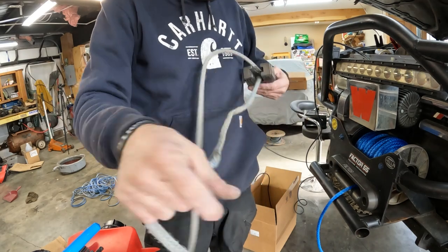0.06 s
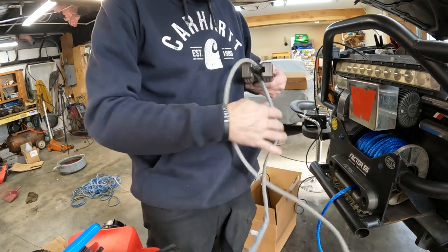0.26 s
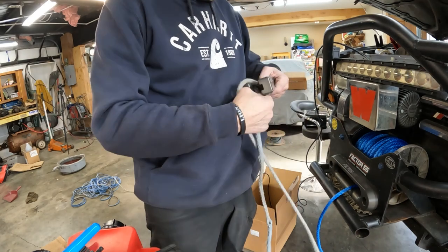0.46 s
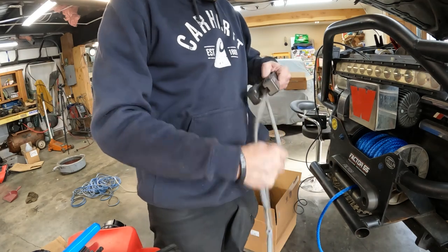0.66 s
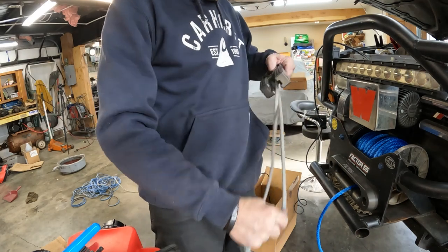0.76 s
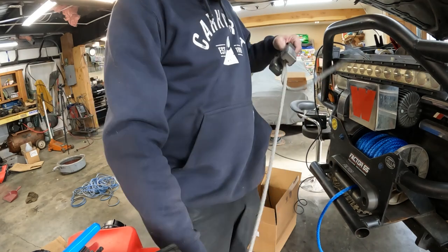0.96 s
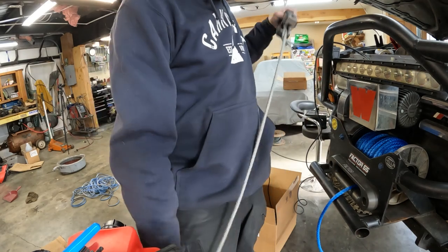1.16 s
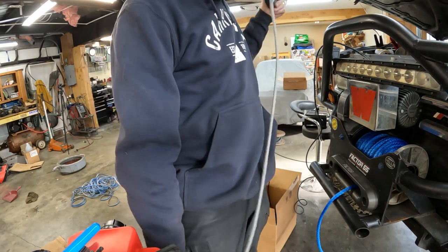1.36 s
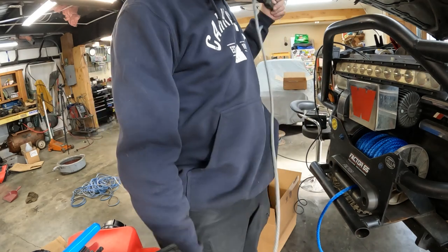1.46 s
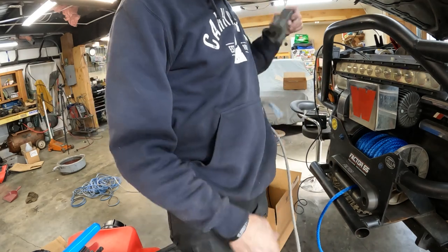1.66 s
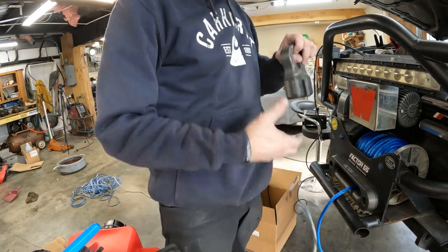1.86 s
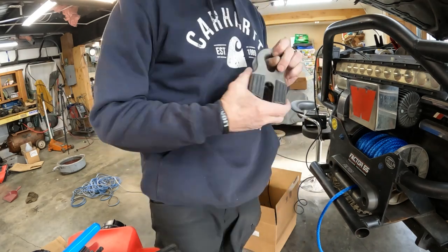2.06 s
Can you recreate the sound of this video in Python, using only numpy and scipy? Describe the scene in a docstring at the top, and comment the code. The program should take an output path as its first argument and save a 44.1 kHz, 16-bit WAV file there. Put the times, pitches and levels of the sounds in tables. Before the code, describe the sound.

A braided rope hisses softly through a hand in a workshop. Low hollow thumps come early, then a double tock, and near the end a metal fitting knocks sharply and clicks. Ventilation rumbles steadily behind the close sounds.

```python
"""Workshop: a hand slides along a braided rope. Fibres hiss on the skin, strands tick under the grip, and the
rope snaps through the fingers with a double tock. The swinging rope thumps, and each tug pulls it taut so that
its low modes boom on. The metal end fitting knocks and clicks as it changes hands. Ventilation rumbles and hums
throughout; arm swings stir a low draught."""
import sys
import numpy as np
from scipy import signal
from scipy.fft import rfft, irfft, next_fast_len
from scipy.io import wavfile
from scipy.ndimage import map_coordinates

SR = 44100
rng = np.random.default_rng(int(sys.argv[2]) if len(sys.argv) > 2 else 0)


def to_wav(s):
    """Save 16-bit WAV."""
    ch = np.atleast_2d(s).T  # columns
    pcm = np.round(np.clip(ch, -1, 1) * 32767)  # PCM
    wavfile.write(sys.argv[1], SR, pcm.astype(np.int16))


N = 92610
T = np.arange(N) / SR

# Sliding hiss envelope (time [s], level [dB])
SLIDE_LEVELS = [(0, -55), (.02, -57), (.085, -65), (.24, -72.5), (.29, -63.5), (.42, -69.5), (.55, -68),
                (.65, -59), (.73, -54.5), (.8, -54.5), (.92, -57.5), (1.04, -62.5), (1.14, -60),
                (1.25, -62.5), (1.3, -69), (1.39, -71), (1.44, -62.5), (1.53, -74), (1.69, -66.5),
                (1.78, -70), (1.82, -58), (1.87, -67), (1.96, -70.5), (2.04, -63.5), (2.1, -72)]
# Skin-on-braid friction (frequency [Hz], gain [dB])
BRAID_SPECTRUM = [(200, -44), (700, 1), (1500, -7), (2600, 2), (3600, 0.5), (4700, -1.5), (5500, -8),
                  (6800, -9), (8300, -6), (11000, -12), (15500, -18)]
# Strand ticks and tock grit (frequency [Hz], gain [dB])
STRAND_SPECTRUM = [(300, 2), (900, 1), (2500, 0.5), (4200, -8), (6000, -23), (15000, -25)]
# Rope snaps (time [s], level [dB])
TOCK_HITS = [(.8285, -40), (.8365, -44)]
# Tock resonances (frequency [Hz], gain [dB])
TOCK_MODES = [(1000, -3), (1220, 2), (1650, -1), (2060, -4), (2550, -10)]
# Rope blows (time [s], thud [dB], thud centre [Hz], boom [dB], slap [dB], slap cutoff [Hz], push [dB])
THUMP_HITS = [(0.058, -76, 120, -44, -80, 800, -52), (0.2614, -29.5, 99, -31.5, -36.5, 880, -36.5),
              (0.276, -36, 190, -59, -46.5, 890, -24), (.288, -27, 137, -28, -72, 800, -42),
              (.3515, -29, 170, -26.5, -32, 1520, -32), (.362, -22.5, 141, -49, -34.5, 1130, -40),
              (0.377, -29, 136, -47, -50, 1000, -58), (.396, -34, 176, -50, -46, 1190, -30),
              (1.388, -31, 127, -38, -59.5, 500, -39), (1.411, -33, 130, -52, -64, 500, -28)]
# Rope slap (frequency [Hz], gain [dB])
SLAP_SPECTRUM = [(100, -42), (330, 9), (480, -2.5), (720, 3), (900, 2), (1150, -0.5), (1450, -16.5),
                 (1900, -17), (3300, -18)]
# Taut rope modes (frequency [Hz], gain [dB], T60 [s])
BOOM_MODES = [(95.55, -1, 1.1), (134, -5, 0.47), (159.2, 1.5, 0.24), (217.8, -15.5, .28),
              (244.8, -17, 0.26), (357.6, -12.5, .22)]
# Fitting impacts (time [s], crack [dB], low cutoff [Hz], high cutoff [Hz], knock [dB])
FITTING_HITS = [(0.111, -52, 990, 3980, -75), (.186, -53.5, 1500, 9200, -80),
                (0.3513, -40.5, 800, 3040, -59), (0.393, -47, 6900, 11800, -65),
                (1.144, -45, 1200, 11900, -45), (1.2647, -46.5, 1500, 3560, -75),
                (1.7994, -34, 600, 5900, -32), (1.8304, -35, 1200, 9000, -47),
                (1.8324, -25, 443, 13700, -41.5), (1.8372, -34, 600, 11000, -64),
                (1.847, -53, 900, 9000, -43), (1.983, -46.5, 4550, 10700, -70),
                (2.0038, -51, 4000, 6700, -44), (2.0235, -48, 1480, 7000, -53),
                (2.03, -38.5, 1200, 6070, -49), (2.04, -50, 1500, 6460, -65),
                (2.0476, -42, 1490, 4970, -64)]
# Fitting crack (frequency [Hz], gain [dB])
CRACK_SPECTRUM = [(300, -9), (750, 0), (1100, 1), (1500, -1), (2200, 1), (2800, 2), (3600, 2), (4400, 0),
                  (5600, -6), (7000, -6), (9000, -6), (12000, -10), (15500, -17)]
# Dull knock of the fitting (frequency [Hz], gain [dB])
KNOCK_SPECTRUM = [(60, -30), (240, 24.5), (450, 2), (800, 7), (1150, -7), (2000, -1), (6000, -60)]
# Ventilation rumble (frequency [Hz], gain [dB])
VENT_SPECTRUM = [(15, 10), (28, 2), (45, 7), (70, 8), (130, -1), (250, -0.5), (450, -4), (750, -1.5),
                 (1050, -6.5), (1400, -12.5), (2000, -22), (3500, -41), (6000, -32.5), (10000, -41.5),
                 (15500, -38)]
# Motor partials (frequency [Hz], level [dB])
HUM_PARTIALS = [(120, -65.5), (240, -68.5), (360, -68), (480.4, -60.5), (720, -70.5)]
# Air moving at the microphone (frequency [Hz], gain [dB])
DRAUGHT_SPECTRUM = [(2, -71), (10, 38), (20, 34.5), (35, -18.5), (70, -58), (200, -60)]
# Arm swings (time [s], draught boost [dB])
ARM_SWINGS = [(.25, 15.5), (0.748, 10)]
# Room decay (frequency [Hz], T60 [s])
ROOM_DECAY = [(100, 0.53), (1000, 0.39), (4000, .33), (12000, 0.13)]


def braid_hiss(grain_db=1.0, sway_db=0.87):
    """Fibres rub the skin in fine grains."""
    fibres = rng.standard_normal(N) * amp(grain_db * wobble(900) + sway_db * wobble(41))
    level_db = np.interp(T, *np.transpose(SLIDE_LEVELS))
    return coloured(fibres, BRAID_SPECTRUM) * amp(level_db)


def strand_ticks(rate_hz=247.8, jitter=0.22, scatter_db=2.0, grip_s=0.738, grip_sigma_s=0.032):
    """Single strands tick past the fingers during a brief firm grip."""
    gaps, sizes = rng.standard_normal(size=(700, 2)).T
    times_s = np.cumsum(np.exp(jitter * gaps)) / rate_hz
    slips = np.bincount((times_s * SR).astype(int), amp(-scatter_db * sizes), minlength=N)[:N]
    ticks = signal.fftconvolve(slips, fade(t60_s=0.0029))[:N] * rng.standard_normal(N)
    grip = bell(T - grip_s, grip_sigma_s)
    return amp(-52.5) * grip * coloured(ticks, STRAND_SPECTRUM)


def rope_tocks(grit_db=-6):
    """The rope snaps through the fingers: a hollow double tock after the fastest part of the stroke."""
    out = np.zeros(N)
    for time_s, level_db in TOCK_HITS:
        modes = sum(amp(db) * np.sin(2 * np.pi * (hz * T + rng.random())) for hz, db in TOCK_MODES)
        grit = amp(grit_db) * noise(STRAND_SPECTRUM)
        add(out, time_s, amp(level_db) * burst(unit(modes) + grit, t60_s=0.045))
    return out


def rope_thumps(thud_sigma_oct=0.62, push_s=0.014):
    """Each soft blow gives a thud, a slap and a push of air."""
    out = np.zeros(N)
    push = np.sin(2 * T / push_s) * np.exp(-0.5 * T / push_s)
    for time_s, thud_db, thud_hz, _, slap_db, cutoff_hz, push_db in THUMP_HITS:
        band = lambda hz: bell(np.log2((hz + 1) / thud_hz), thud_sigma_oct)
        lowpass = lambda hz: 1 / np.hypot(1, (hz / cutoff_hz) ** 6)
        thud = burst(filtered(rng.standard_normal(N), band), t60_s=0.089)
        slap = burst(filtered(noise(SLAP_SPECTRUM), lowpass), t60_s=0.075)
        add(out, time_s, amp(thud_db) * thud + amp(slap_db) * slap + amp(push_db) * push)
    return out


def taut_ring(attack_s=0.034, drift_rad=0.069):
    """Each thump pulls the rope taut and sets its low modes ringing on."""
    out = np.zeros(N)
    attack = 1 - np.exp(-T / attack_s)
    for hz, mode_db, t60_s in BOOM_MODES:
        energy = np.zeros(N)
        for time_s, _, _, boom_db, *_ in THUMP_HITS:
            add(energy, time_s, (amp(boom_db + mode_db) * fade(t60_s) * attack) ** 2)
        phase_rad = 2 * np.pi * (hz * T + rng.random()) + drift_rad * wobble(25)
        out += np.sqrt(energy) * np.sin(phase_rad)
    return out


def fitting_knocks(chatter_db=-14):
    """The fitting cracks and knocks dully; loose parts chatter. The hand damps any ring."""
    out = np.zeros(N)
    for time_s, crack_db, low_hz, high_hz, knock_db in FITTING_HITS:
        band = lambda hz: hz ** 2 / (hz ** 2 + low_hz ** 2) / np.hypot(1, (hz / high_hz) ** 5)
        crack = burst(filtered(noise(CRACK_SPECTRUM), band), t60_s=0.0069)
        chatter = amp(chatter_db) * burst(filtered(noise(CRACK_SPECTRUM), band), t60_s=0.03)
        knock = burst(noise(KNOCK_SPECTRUM), t60_s=0.024)
        add(out, time_s, amp(crack_db) * (crack + chatter) + amp(knock_db) * knock)
    return out


def early_echoes(x, delay_s=0.002):
    """Quick scatter off the bench and nearby surfaces."""
    echoes = rng.standard_normal(N) ** 3 * fade(t60_s=0.18) * (T > delay_s)
    return signal.fftconvolve(x, echoes / np.linalg.norm(echoes))[:N]


def room_tail(x):
    """Diffuse workshop reverberation; treble dies first."""
    hz, time_s, bins = signal.stft(rng.standard_normal(SR // 2), SR, nperseg=256)
    decay = np.exp(-np.log(1000) * time_s / log_interp(ROOM_DECAY, hz)[:, None])
    _, tail = signal.istft(bins * decay, SR, nperseg=256)
    return signal.fftconvolve(x, tail / np.linalg.norm(tail))[:N]


def ventilation(rumble_db=-51, waver_db=0.6, drift_rad=0.12):
    """Steady air rumble and slightly wavering motor hum."""
    hum = np.zeros(N)
    for hz, db in HUM_PARTIALS:
        peak = np.sqrt(2) * amp(db + waver_db * wobble(4.7))
        hum += peak * np.sin(2 * np.pi * hz * T + drift_rad * wobble(2))
    return amp(rumble_db) * noise(VENT_SPECTRUM) + hum


def draught(rest_db=-47, swing_sigma_s=0.037):
    """Air drifts over the microphone, more when the arm swings."""
    boost_db = sum(db * bell(T - time_s, swing_sigma_s) for time_s, db in ARM_SWINGS)
    return amp(rest_db + boost_db) * noise(DRAUGHT_SPECTRUM)


def amp(db):
    """Decibels to gain."""
    return 10 ** (np.asarray(db) / 20)


def unit(x):
    """Scale to rms 1."""
    return x / np.sqrt(np.mean(x ** 2) + 1e-20)


def bell(offset, sigma):
    """Gaussian, peak 1."""
    return np.exp(-0.5 * (offset / sigma) ** 2)


def log_interp(points, hz):
    """Interpolate (frequency [Hz], value) points on a log axis."""
    knots_hz, values = np.transpose(points)
    return np.interp(np.log(hz + 1), np.log(knots_hz + 1), values)


def fade(t60_s):
    """Exponential decay."""
    return np.exp(-np.log(1000) * T / t60_s)


def wobble(rate_hz):
    """Smooth random curve with knots at rate_hz."""
    return map_coordinates(rng.standard_normal(int(N * rate_hz / SR) + 4), [T * rate_hz])


def filtered(x, response):
    """Zero-phase filter with gain response(hz)."""
    size = next_fast_len(N + SR // 2)
    return irfft(rfft(x, size) * response(np.fft.rfftfreq(size, 1 / SR)), size)[:N]


def coloured(x, spectrum):
    """x shaped by a spectrum, rms 1."""
    return unit(filtered(x, lambda hz: amp(log_interp(spectrum, hz))))


def noise(spectrum):
    """Shaped noise, rms 1."""
    return coloured(rng.standard_normal(N), spectrum)


def burst(sound, t60_s):
    """Fast rise and decay; energy set by the envelope alone."""
    envelope = fade(t60_s) * (1 - fade(t60_s / 10))
    return unit(sound * envelope) * np.sqrt(np.mean(envelope ** 2))


def add(out, time_s, sound):
    """Mix in from time_s."""
    start = max(0, round(time_s * SR))
    out[start:] += sound[:N - start]


def scene(tail_db=-13.5, early_db=-10.5):
    """Mono mix; only the impacts excite the room."""
    hard = fitting_knocks() + rope_tocks()
    soft = rope_thumps()
    hard_room = amp(tail_db) * room_tail(hard) + amp(early_db) * early_echoes(hard)
    soft_room = amp(tail_db) * room_tail(soft)
    impacts = hard + soft + hard_room + soft_room + taut_ring()
    slide = braid_hiss() + strand_ticks()
    return (impacts + slide + ventilation() + draught())[None]


def record(dry, cutoff_hz=15900):
    """Brick-wall low-pass."""
    return np.array([filtered(x, lambda hz: hz < cutoff_hz) for x in dry])


dry = scene()
out = record(dry)
to_wav(out)
```